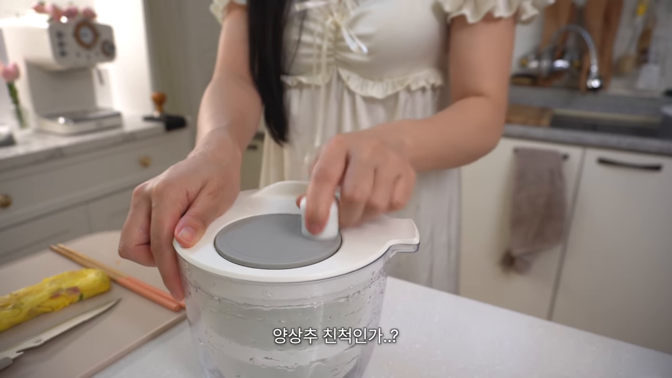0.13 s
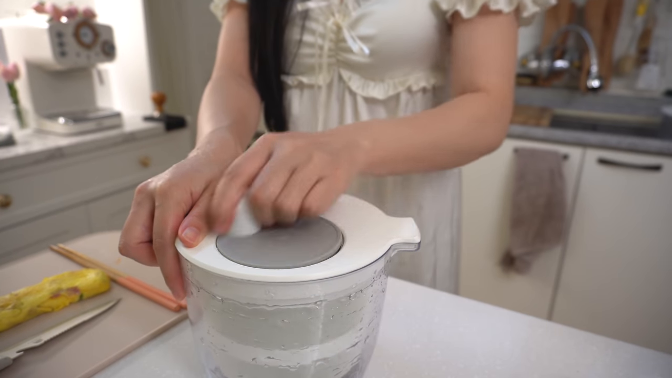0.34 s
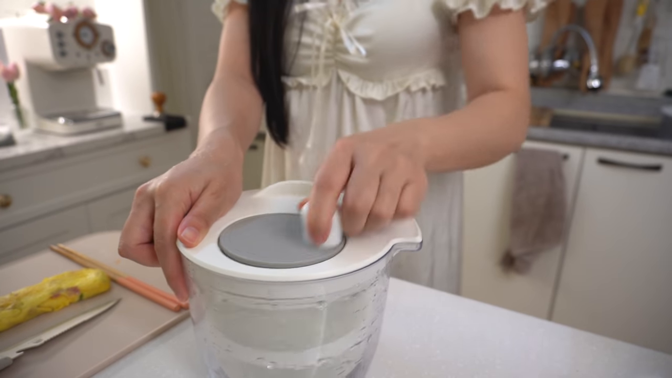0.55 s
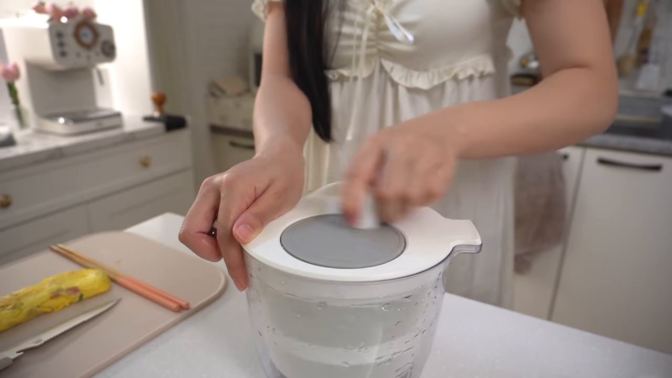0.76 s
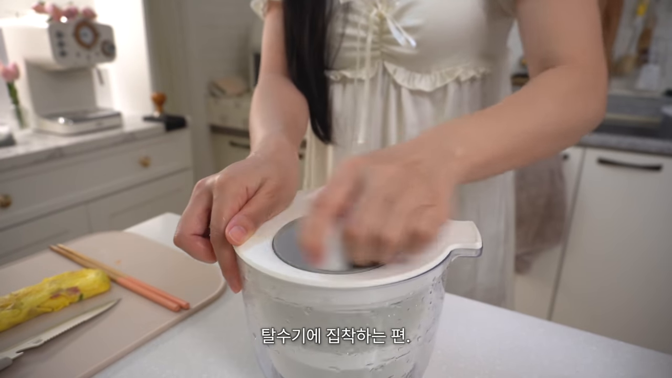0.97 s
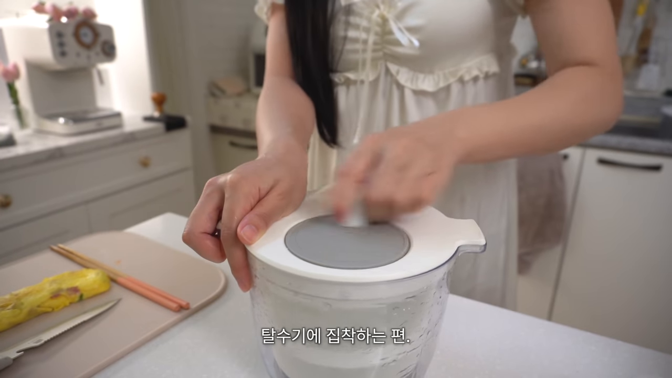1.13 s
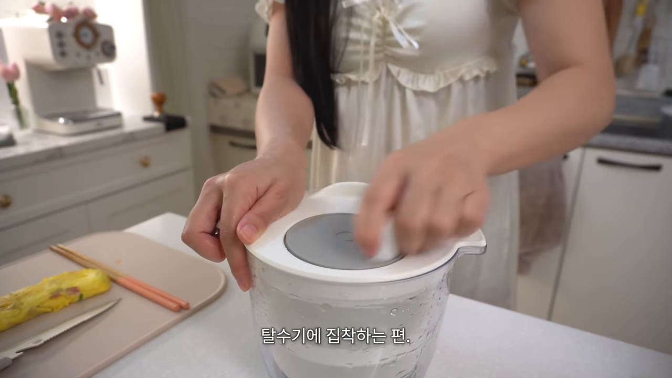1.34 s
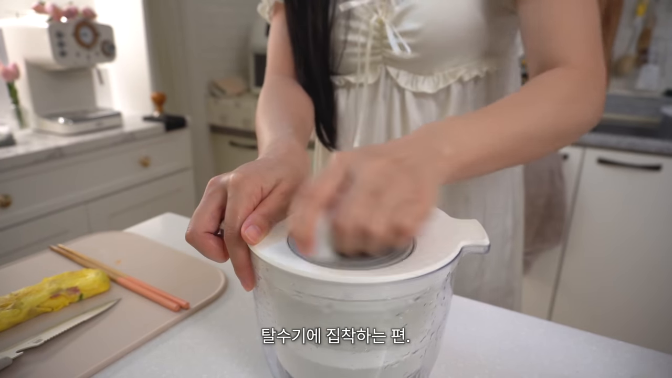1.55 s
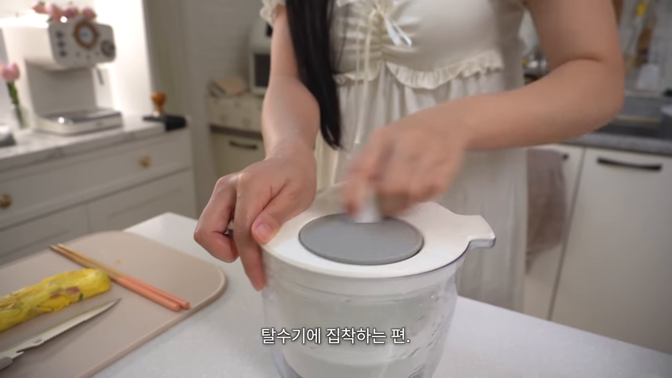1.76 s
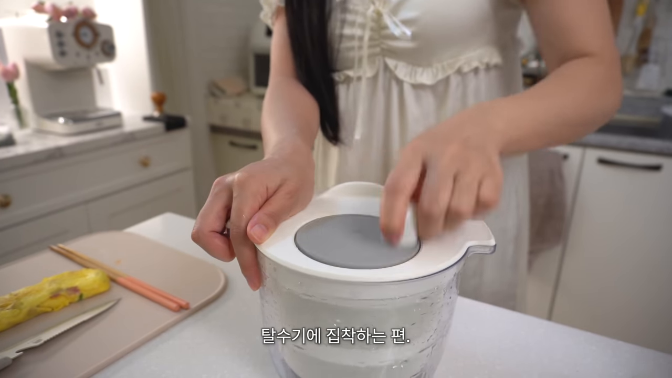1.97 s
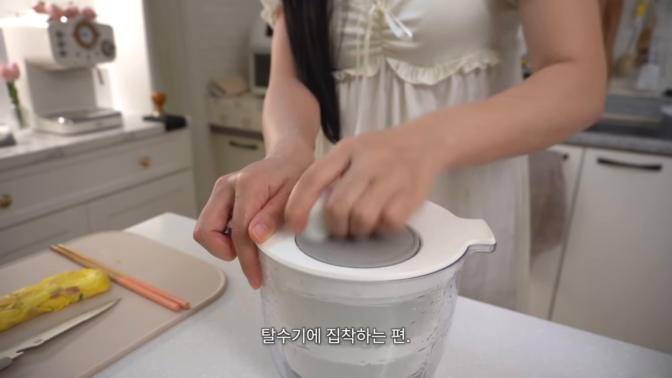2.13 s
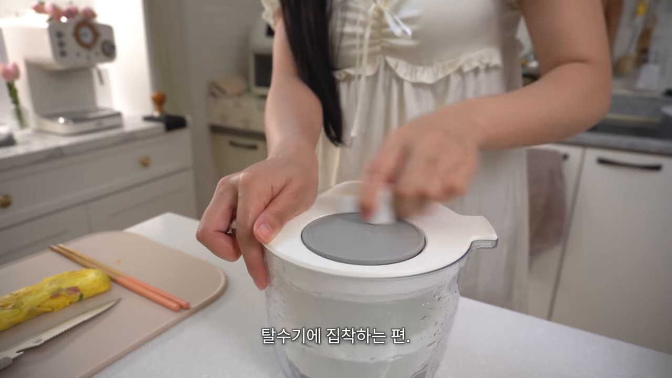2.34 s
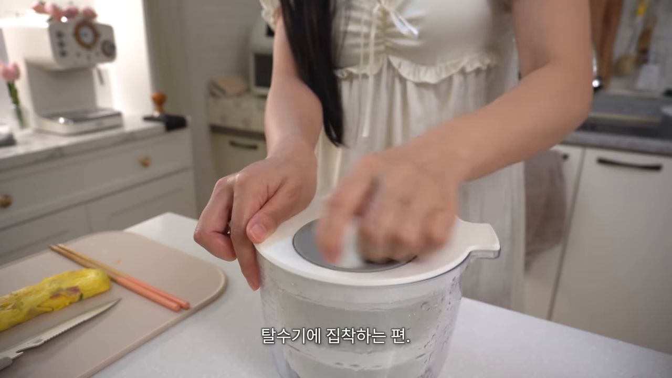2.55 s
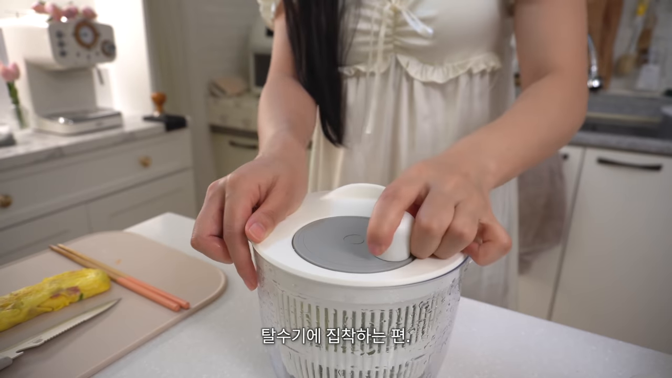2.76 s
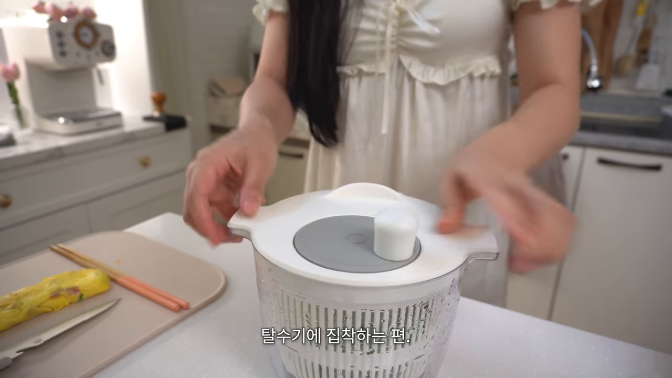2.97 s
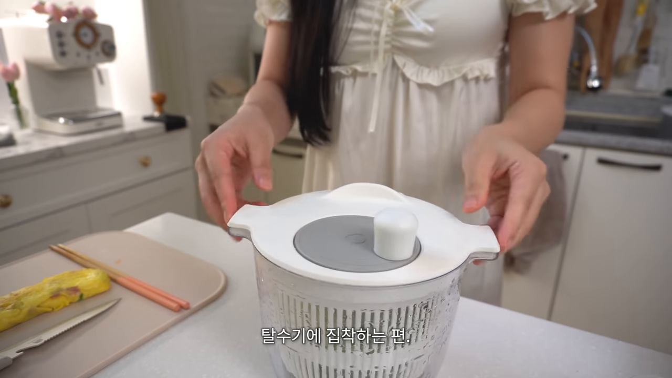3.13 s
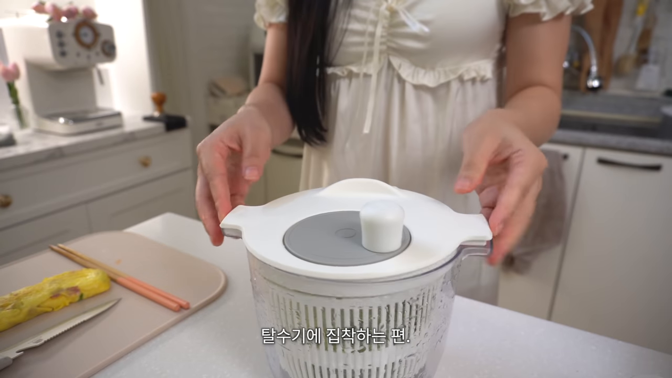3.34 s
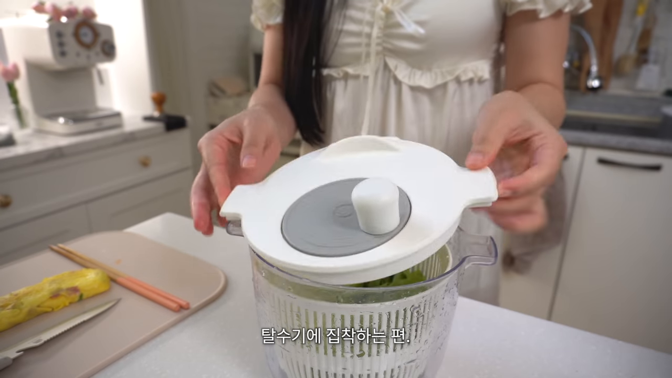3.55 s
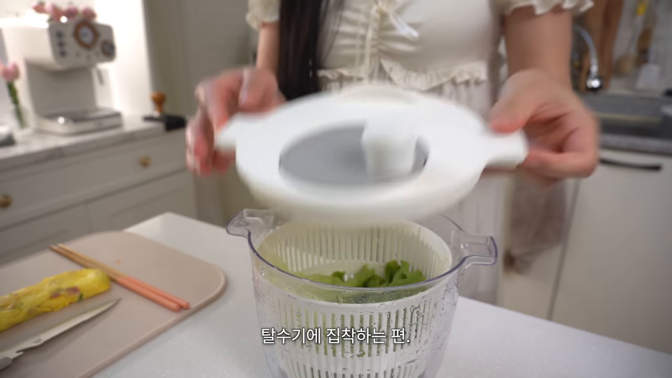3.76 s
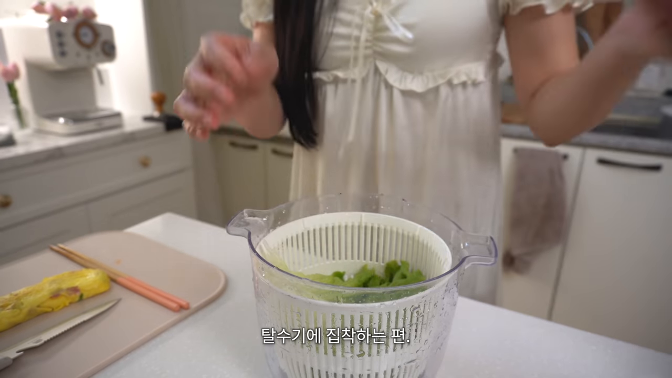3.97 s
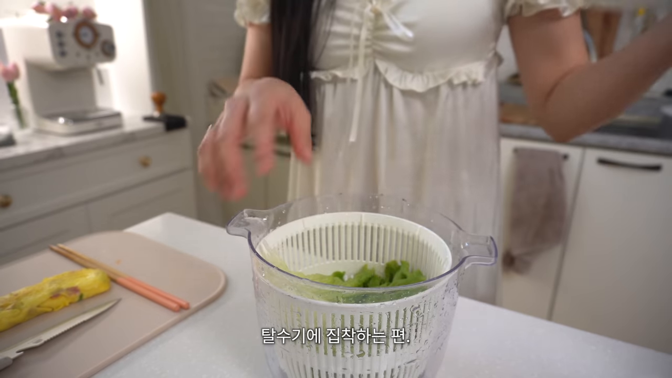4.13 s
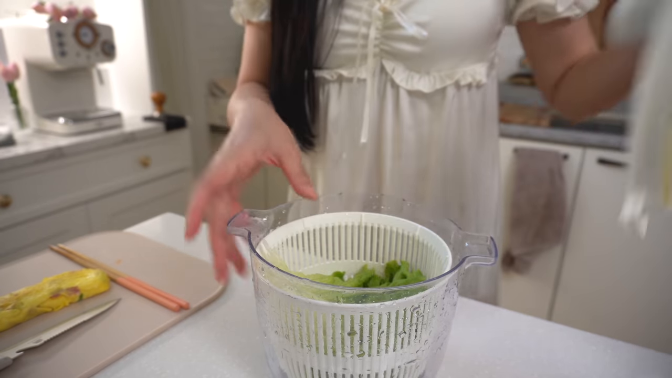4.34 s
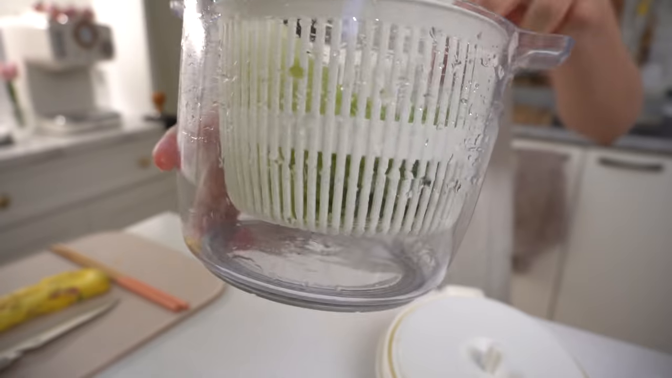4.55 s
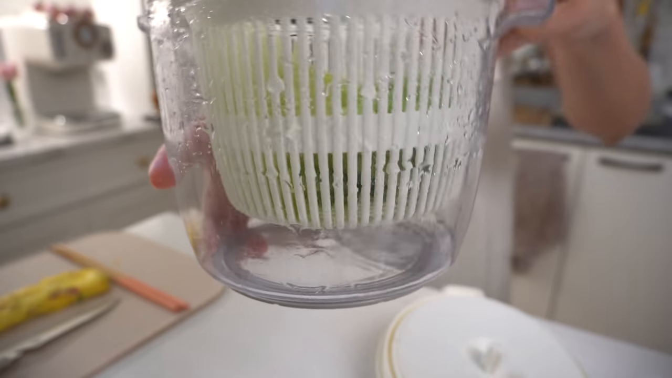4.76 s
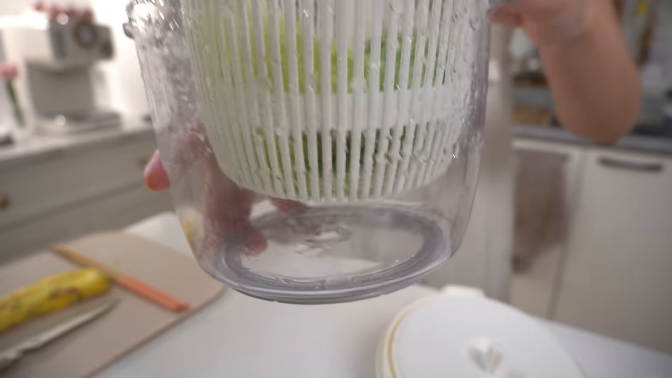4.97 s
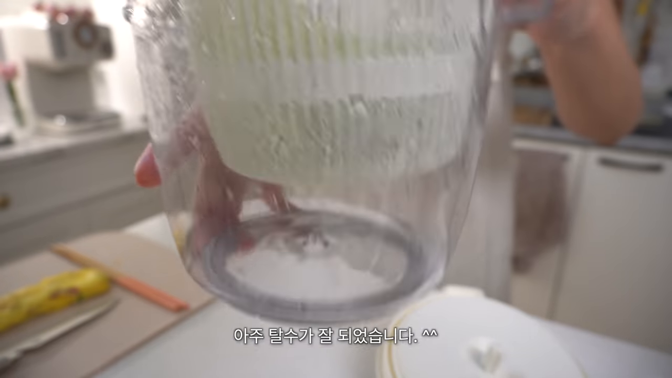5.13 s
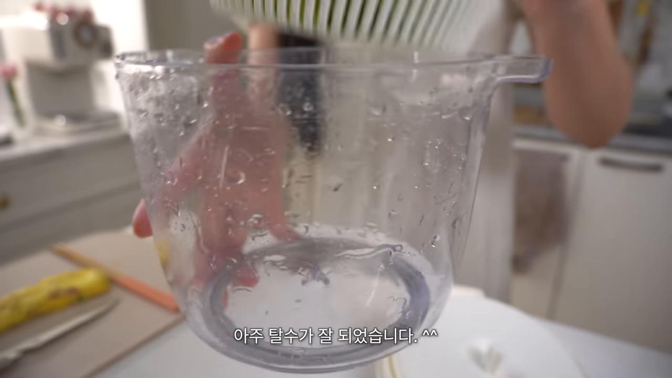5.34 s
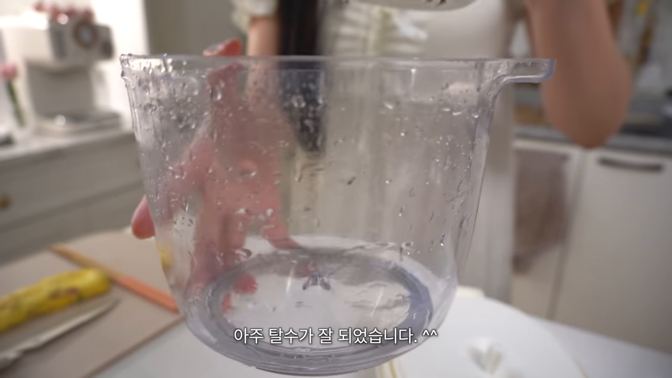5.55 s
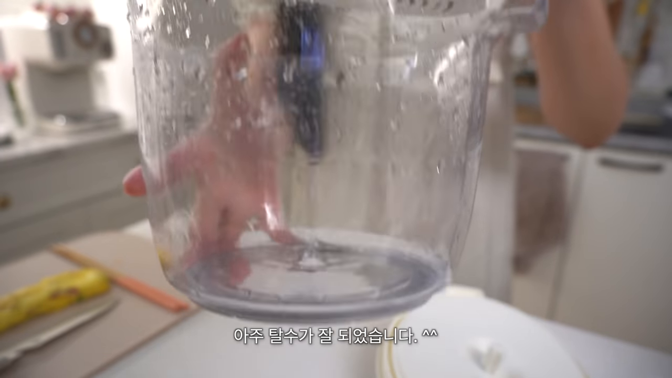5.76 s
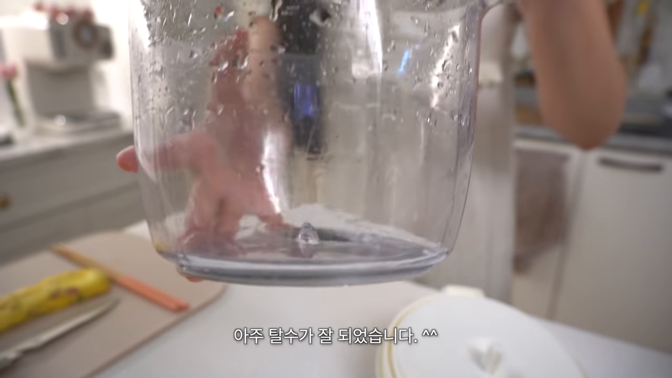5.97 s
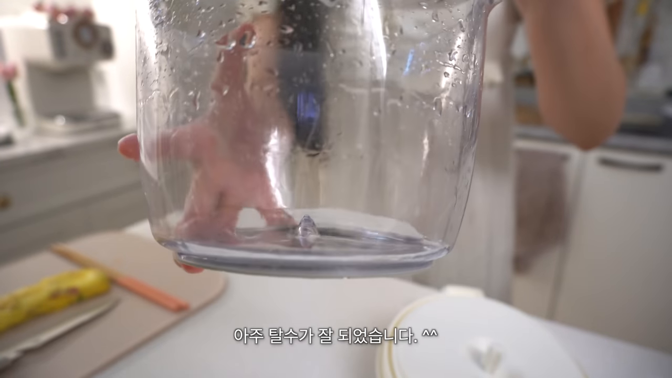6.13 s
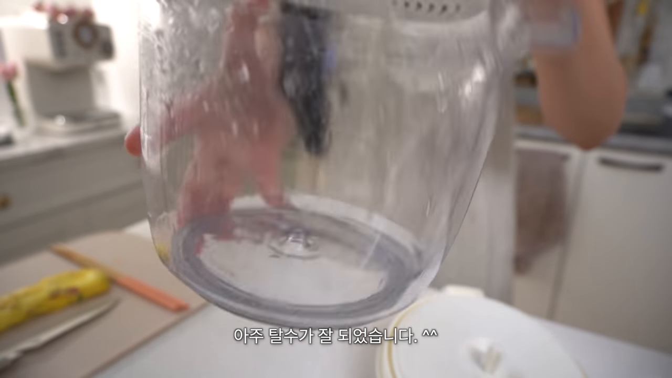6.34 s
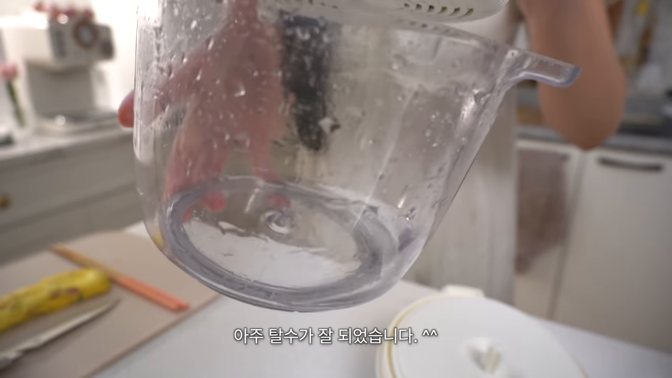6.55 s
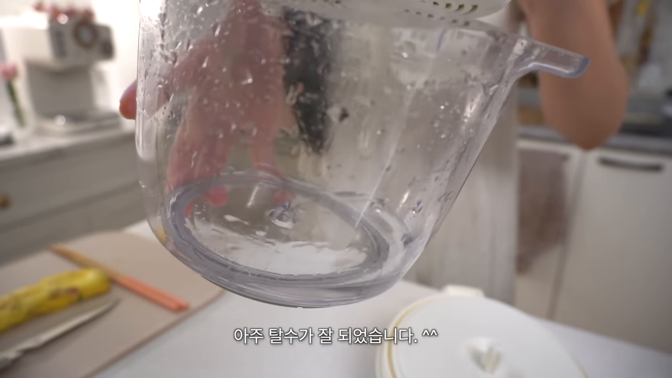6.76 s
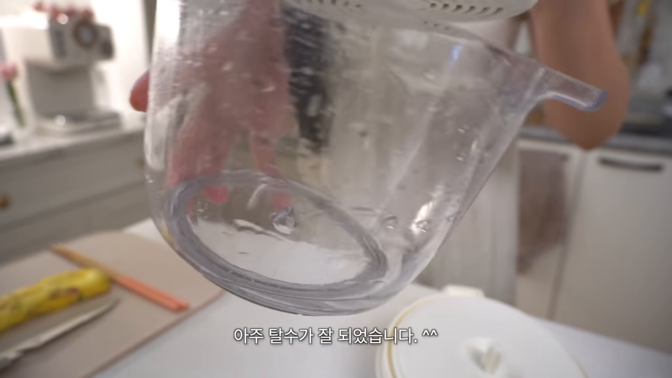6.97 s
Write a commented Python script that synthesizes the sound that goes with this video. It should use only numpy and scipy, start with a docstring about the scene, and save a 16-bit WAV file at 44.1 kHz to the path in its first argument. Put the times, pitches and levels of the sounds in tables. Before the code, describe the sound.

Close to the microphone in a home kitchen, a plastic salad spinner is cranked hard: rapid gear chatter, a hollow low rumble, sharp clacks and bowl knocks, pulsing with each turn. It stops dead, then the lid is unclipped and lifted with clicks and soft hollow thuds. After a quiet gap, the basket slides out with a sharp tick, small scrapes and faint bumps over low room hum.

```python
"""Over a quiet room hum and slow low handling thumps, a hand-cranked plastic salad spinner rattles close by:
gear teeth shake bowl and lid, with clacks, treble swishes, bowl knocks and bumps, until the brake at 2.6 s.
The lid is unclipped and lifted: clicks of plastic, thuds of the closed bowl, a scrape.
The slotted basket is drawn out and the bowl tilted in the hand: clicks, open-bowl thuds, scrapes and bumps.
Modes, filtered noise and short bursts make the sounds; a short kitchen echo follows the near ones."""
import sys
import numpy as np
from scipy import signal
from scipy.fft import rfft, irfft
from scipy.io import wavfile
from scipy.ndimage import uniform_filter1d

SR = 44100
rng = np.random.default_rng(int(sys.argv[2]) if len(sys.argv) > 2 else 0)


def generate_wav(sig):
    """Save sig (samples, or channels by samples) to the path in sys.argv[1] as 16-bit PCM at SR."""
    pcm = np.round(np.clip(np.atleast_2d(sig).T, -1, 1) * 32767).astype(np.int16)
    wavfile.write(sys.argv[1], SR, pcm)


N = 308700


def amp(db):
    """dB to gain."""
    return 10 ** (np.asarray(db) / 20)


def evened(x):
    """Scaled to rms 1."""
    return x / np.sqrt(np.mean(x ** 2) + 1e-20)


def noise():
    """White noise of full length, rms about 1."""
    return rng.standard_normal(N)


def drift(samples):
    """Slow random curve, rms 1."""
    return evened(uniform_filter1d(uniform_filter1d(noise(), samples), samples))


def read(points, hz):
    """Table over frequency, interpolated on a log axis."""
    point_hz, value = np.transpose(points)
    return np.interp(np.log(hz + 1), np.log(point_hz + 1), value)


def curve(rows):
    """Every column of a table over time, sample by sample."""
    s, *columns = np.transpose(rows)
    return [np.interp(np.arange(N) / SR, s, column) for column in columns]


def add(mix, s, sound):
    """Mixes a sound in at second s."""
    part = mix[round(s * SR):][:len(sound)]
    part += sound[:len(part)]


def coloured(x, spectrum):
    """Causal minimum-phase filter with the given spectrum; output rms 1."""
    hz = abs(np.fft.fftfreq(8192, 1 / SR))
    log_gain = np.log(amp(np.maximum(read(spectrum, hz), -100)))
    taps = np.fft.ifft(np.exp(np.conj(signal.hilbert(log_gain)))).real[:4096]
    return evened(signal.oaconvolve(x, taps)[:len(x)])


def sliding(x, hz, width_hz):
    """Resonance whose pitch follows the curve hz: shift to 0 Hz, one-pole low-pass, shift back."""
    turn = np.exp(2j * np.pi * np.cumsum(hz) / SR)
    r = np.exp(-np.pi * width_hz / SR)
    return evened((turn * signal.lfilter([1 - r], [1, -r], x / turn)).real)


def ring(modes, colour_hz, octaves, damping=0.94, contact_cycles=0.13, spread=.012):
    """Struck object: decaying modes, those near the blow's colour favoured, softened by the contact; peak 1."""
    hz, db, t60_s = np.transpose(modes)[:, :, None]
    t = np.arange(SR // 4) / SR
    db = db - 11.0 * (np.log2(hz / colour_hz) / octaves) ** 2 + 2 * rng.standard_normal(hz.shape)
    detune = 1 + spread * rng.standard_normal(hz.shape)
    phase = 2 * np.pi * hz * t * detune + 2 * rng.random(hz.shape)
    soft = (1 - np.exp(-t * colour_hz / contact_cycles)) ** 2
    sound = soft * (amp(db - 60 * t * damping / t60_s) * np.sin(phase)).sum(0)
    return sound / abs(sound).max()


# modes of the thin plastic of lid, basket and rim: pitch_hz, level_db, t60_s (before damping)
PLASTIC_MODES = [(973, 9.5, 0.034), (1150, -1, 0.034), (1329, 5.5, 0.014), (1550, 5, 0.011),
                 (1910, 9.5, 0.014), (2180, 8, 0.01), (2586, 8.5, 0.012), (2995, 6.5, 0.016),
                 (3490, -0.5, 0.016), (3900, -4, 0.0033), (4230, -12, 0.0023), (5050, -6, 0.024),
                 (5900, 2.5, 0.006)]


def contacts(shape, colour_hz, top_db, edge, noisy=1.0, octaves=0.64, grainy_db=6.5):
    """Tiny uneven contacts under a shape: noise around the colour, cut below edge x colour, rings the plastic."""
    grains_db = grainy_db * np.repeat(rng.standard_normal(len(shape) // 40 + 1), 40)[:len(shape)]
    burst = shape * amp(grains_db) * rng.standard_normal(len(shape))
    slope = [(.5 * edge * colour_hz, -36), (edge * colour_hz, -8), (colour_hz, 0),
             (1.45 * colour_hz, -9), (20000, top_db)]
    rung = signal.oaconvolve(burst, ring(PLASTIC_MODES, colour_hz, octaves))[:len(shape)]
    return noisy * coloured(burst, slope) + evened(rung)


def click(colour_hz, t60_s, top_db, edge):
    """Burst of contacts with a sharp 10 ms start and a tail over t60_s; peak 1."""
    t = np.arange(SR // 4) / SR
    decay = amp(-60 * t / t60_s) + 1.6 * amp(-60 * t / 0.01)
    onset = 1 - np.exp(-t / 0.00056)
    sound = contacts(decay * onset, colour_hz, top_db, edge, noisy=1.4, grainy_db=4.0)
    return sound / abs(sound).max()


# hum spectrum: pitch_hz, level_db_per_hz (relative)
HUM_SPECTRUM = [(41, -65), (70, -24.5), (96, -18.5), (162, -6), (243, -9), (278, 0.5), (340, -10.5),
                (525, -14), (863, -16), (2340, -35.5), (5160, -41.5), (15600, -45.5)]
HUM_DB = -66
# faint wavering tone: pitch_hz, level_db
WHISTLES = [(5281, -88.5)]
# level of the sub-bass sway: time_s, level_db
HANDLING_LEVEL = [(0.0, -47), (1.0, -38.5), (1.73, -36), (3.78, -59.5), (4.99, -50), (5.66, -65.5),
                  (6.28, -57.5), (6.58, -64), (6.99, -55)]
# sway spectrum: pitch_hz, level_db_per_hz (relative)
SWAY_SPECTRUM = [(5, -6), (14, 16), (35, -4.5), (60, -2.5), (100, -44)]


def room_tone():
    """Steady hum of filtered noise, a faint tone wavering in level and phase, and sub-bass handling sway."""
    tone = amp(HUM_DB) * coloured(noise(), HUM_SPECTRUM)
    t = np.arange(N) / SR
    for hz, db in WHISTLES:
        waver = evened(uniform_filter1d(noise(), 2500))
        tone += amp(db + 3.0 * waver) * np.sin(2 * np.pi * hz * t + 3.0 * waver)
    return tone + amp(curve(HANDLING_LEVEL)[0]) * coloured(noise(), SWAY_SPECTRUM)


# the crank: time_s, rumble_db, rattle_db (above the rumble), teeth_per_s (mean pace)
CRANK = [(0.0, -30, -8.5, 75.7), (0.4, -30.5, -7, 68.4), (0.65, -28.5, 1.5, 84), (0.9, -25.5, -11, 87.6),
         (1.2, -27.5, -2.5, 93), (1.5, -28.5, -5, 119), (1.68, -27, -6, 102), (2.05, -26.5, -5.5, 113.6),
         (2.35, -28, -8.5, 100.3), (2.6, -32, -8, 81)]
# the hand eases off once a turn and the gear runs slack: middle_s, dip_db (of the rattle)
SLACKS = [(0.197, -10), (0.588, -14.5), (0.76, -6), (1.09, -10.5), (1.422, -6), (1.75, -7), (2.047, -6),
          (2.369, -7)]
SLACK_S, RUMBLE_SHARE = 0.072, 0.61  # Gaussian sigma of a dip; share of it the rumble follows
BRAKE_S, BRAKE_DB_PER_S = 2.602, -370


def cranking():
    """Levels of rumble and rattle, dipped at every slack and cut by the brake, and the pace of the gear."""
    t = np.arange(N) / SR
    rumble_db, rattle_db, teeth_per_s = curve(CRANK)
    slack_db = sum(db * np.exp(-.5 * ((t - s) / SLACK_S) ** 2) for s, db in SLACKS)
    brake_db = BRAKE_DB_PER_S * np.maximum(t - BRAKE_S, 0)
    rumble_db = rumble_db + RUMBLE_SHARE * slack_db + brake_db
    rattle_db = rattle_db + (1 - RUMBLE_SHARE) * slack_db  # relative to the rumble
    return rumble_db, rattle_db, teeth_per_s


def gear_teeth(teeth_per_s):
    """Loose teeth strike with uneven force at a wandering pace: one impulse a tooth."""
    wander = .2 * evened(uniform_filter1d(noise(), 300)) + .04 * drift(1500)
    turns = np.floor(np.cumsum(teeth_per_s * np.clip(1 + wander, .2, 3)) / SR)
    return (np.diff(turns, prepend=0) > 0) * amp(3 * np.minimum(noise(), 1))


# modes of air and walls of the bowl under the lid: pitch_hz, level_db, t60_s (before damping)
CLOSED_MODES = [(161, -7, 0.082), (188, -0.5, 0.089), (272, -8, 0.15), (309.5, 0, 0.07), (374, 0.5, 0.0943),
                (418, -3, 0.095), (493, -5.5, 0.16), (574, -5, 0.087), (720, 6.5, 0.028)]


def shaken_bowl(shake):
    """Shaking spread at random over six places of the closed bowl, each ringing in its own colour."""
    patch = rng.integers(0, 6, N)
    bowl = np.zeros(N)
    for k, hz in enumerate(np.geomspace(190, 540, 6)):
        push = shake * (patch == k) * amp(4 * drift(1800))
        bowl += signal.oaconvolve(push, ring(CLOSED_MODES, hz, .65, damping=3, spread=.05))[:N]
    return bowl


def rattling_lid(rattle, rattle_db):
    """The contact travels round the lid, so its resonances slide and swell; pressed harder, they rise."""
    lid = np.zeros(N)
    press = 1 + .015 * (np.clip(rattle_db, -15, 0) + 8)
    for hz, _, t60_s in PLASTIC_MODES[:-2]:
        lid += sliding(rattle * amp(5 * drift(1300)), hz * (press + .04 * drift(1800)), 1.7 / t60_s)
    return lid


# rumble spectrum: pitch_hz, level_db_per_hz (relative)
RUMBLE_SPECTRUM = [(41, -43.5), (80, -15.5), (135, -1), (190, 6.5), (444, -4), (504, 2), (821, -21),
                   (982, -5), (1500, -15), (2300, -24.5), (4000, -62)]
# rattle spectrum: pitch_hz, level_db_per_hz (relative)
RATTLE_SPECTRUM = [(410, -25.5), (700, -4), (829, -7), (981, -4), (1630, -7.5), (2140, -6.5), (3300, -13.5),
                   (4500, -17), (5300, -19.5), (7550, -20), (15600, -37)]


def spinner():
    """Gear teeth over sliding noise shake the bowl and tick on the lid."""
    rumble_db, rattle_db, teeth_per_s = cranking()
    teeth = gear_teeth(teeth_per_s)
    bounce = amp(-60 * np.arange(1500) / SR / .016)  # each tooth bounces for a few ms
    chatter = signal.oaconvolve(teeth, bounce)[:N]
    rattle = (evened(chatter) + 0.68) * noise()
    shake = evened(teeth) + 1.25 * noise()
    rumble = .7 * evened(shaken_bowl(shake)) + coloured(shake, RUMBLE_SPECTRUM)
    bright = 1.24 * evened(rattle) + 0.9 * evened(rattling_lid(rattle, rattle_db))
    return amp(rumble_db) * (evened(rumble) + amp(rattle_db) * coloured(bright, RATTLE_SPECTRUM))


# hard plastic clacks while the crank turns: start_s, level_db, colour_hz
CLACKS = [(0.0527, -18.5, 1530), (0.1497, -25, 1340), (0.301, -19.5, 1620), (0.3503, -18, 2208),
          (0.5242, -15, 1450), (0.6452, -15, 1390), (0.6778, -18.5, 1352), (0.841, -20, 1980),
          (0.8628, -14.5, 1745), (1.036, -10, 1588), (1.101, -21, 2180), (1.1427, -15.5, 1443),
          (1.209, -10.5, 1900), (1.257, -13.5, 1506), (1.6635, -16.5, 1347), (1.7996, -17.5, 2000),
          (1.844, -17.5, 1374), (1.9666, -13, 1390), (2.1124, -14.5, 2080), (2.1386, -20.5, 1391),
          (2.2752, -19, 1450), (2.4928, -16.5, 2410), (2.569, -25, 2883)]


def clacks():
    """Each clack is a click, brighter when harder, and a damped ring of the plastic."""
    out = np.zeros(N)
    for s, db, hz in CLACKS:
        add(out, s, amp(db) * click(hz, 0.027, -22.5 + 1.1 * db, 0.31))
        add(out, s, amp(db - 10.5) * ring(PLASTIC_MODES, hz, 0.26, damping=3.0, spread=.04))
    return out


# thin high swishes, perhaps water flung against the wall: middle_s, level_db
SWISHES = [(0.122, -53), (0.285, -52), (0.427, -53), (0.59, -51), (0.828, -50), (1.055, -58.5),
           (1.90, -56.5), (2.55, -58)]
# swish spectrum: pitch_hz, level_db_per_hz (relative)
SWISH_SPECTRUM = [(5000, -27), (9000, -12.5), (14000, -3)]
SWISH_S = .017  # Gaussian sigma


def swishes():
    """Smooth treble hiss that swells and fades."""
    t = np.arange(N) / SR
    shape = sum(amp(db) * np.exp(-.5 * ((t - s) / SWISH_S) ** 2) for s, db in SWISHES)
    return shape * coloured(noise(), SWISH_SPECTRUM)


# the spinning basket knocks the bowl: start_s, level_db, colour_hz
KNOCKS = [(0.381, -12.5, 493), (0.401, -20, 404), (0.527, -9, 466), (0.645, -8, 462), (0.76, -18, 522),
          (0.916, -12, 470), (1.037, -6.5, 263.2), (1.058, -12, 265), (1.14, -15.5, 303),
          (1.256, -11.5, 517), (1.3581, -8.5, 561), (1.556, -11.5, 380), (1.663, -7.5, 517),
          (1.8, -13.5, 343), (1.845, -13, 246), (1.965, -18.5, 213.5), (2.113, -16, 170.7),
          (2.273, -11.5, 542.4), (2.508, -12.5, 302.5), (2.518, -11, 275.5)]


def knocks():
    """Soft blows on the closed bowl, damped fast by the hand on the lid."""
    out = np.zeros(N)
    for s, db, hz in KNOCKS:
        add(out, s, amp(db) * ring(CLOSED_MODES, hz, 0.43, damping=5.7, contact_cycles=0.49))
    return out


# soft low bumps of the hand: start_s, level_db
BUMPS = [(0.629, -26.5), (1.032, -28), (4.93, -40.5), (5.012, -36.5), (5.103, -36), (5.19, -47),
         (5.839, -47), (6.386, -41.5)]
BUMP_HZ = 52.1


def bumps():
    """A low sine that swells and dies within a cycle or two."""
    out = np.zeros(N)
    turns = np.arange(SR // 8) / SR * BUMP_HZ
    bump = np.e * 2 * turns * np.exp(-2 * turns) * np.sin(2 * np.pi * turns)
    for s, db in BUMPS:
        add(out, s, amp(db) * bump)
    return out


# blows on the lid: start_s, click_db, click_hz, thud_db, thud_hz
LID = [(2.8252, -36, 2570, -50, 197), (2.849, -43, 1980, -46, 150), (2.8599, -25, 1480, -36, 280),
       (2.885, -19.5, 1470, -14, 215), (2.9166, -34, 1840, -23, 398), (2.9488, -39.5, 2600, -30, 327),
       (3.024, -37.5, 2330, -22, 238), (3.0739, -49, 2700, -31.5, 210), (3.101, -31, 3770, -28.5, 312),
       (3.12, -35.5, 2630, -22, 353), (3.134, -43.5, 2880, -28.5, 417), (3.1822, -30.5, 2400, -18, 373),
       (3.2411, -46.5, 2390, -48, 374), (3.3379, -36.5, 2490, -26.5, 312), (3.37, -33.5, 4340, -36.5, 296),
       (3.4072, -42.5, 4450, -69, 335), (3.4296, -40.5, 2180, -11.5, 340), (3.461, -36.5, 2000, -23, 350),
       (3.477, -34, 3900, -23.5, 327), (3.5176, -43.5, 3520, -40, 320), (3.5403, -31, 2180, -36, 437)]
LID_T60_S, LID_TREBLE_DB, LOOSE_S = 0.065, -29, 3.3
# octaves, damping, contact_cycles: a loose lid lets the bowl ring longer, at a narrower pitch
HELD, LOOSE = (1, 1.73, 0.13), (0.36, 1.17, 0.35)


def lid_blows():
    """The lid comes off: each blow is a click of the plastic and a thud of the closed bowl."""
    out = np.zeros(N)
    for s, click_db, click_hz, thud_db, thud_hz in LID:
        thud = ring(CLOSED_MODES, thud_hz, *(LOOSE if s > LOOSE_S else HELD))
        add(out, s, amp(click_db) * click(click_hz, LID_T60_S, LID_TREBLE_DB, 0.14))
        add(out, s, amp(thud_db) * thud)
    return out


# wet plastic sliding on plastic: middle_s, level_db, colour_hz, sigma_s
SCRAPES = [(2.874, -49.5, 1870, 0.025), (4.266, -54, 1290, 0.013), (4.325, -58, 1450, 0.012),
           (4.418, -55, 1740, 0.008), (4.508, -62, 2000, 0.012), (4.866, -61, 2900, 0.01),
           (5.094, -57.5, 4500, 0.011), (5.105, -47.5, 1910, 0.0088), (5.184, -65.5, 3200, 0.055),
           (5.217, -56, 3520, 0.0034), (5.244, -55, 2850, 0.007), (5.267, -45, 3730, 0.0092),
           (5.282, -53, 2600, 0.0037), (5.264, -51.5, 5900, 0.0085), (5.876, -60, 2750, 0.018),
           (5.929, -68, 2930, 0.019)]


def scrapes():
    """Fine plastic contacts that swell and fade."""
    out = np.zeros(N)
    t = np.arange(-SR // 5, SR // 5) / SR
    for s, db, hz, sigma_s in SCRAPES:
        shape = np.exp(-.5 * (t / sigma_s) ** 2)
        scrape = contacts(shape, hz, -36, .66, noisy=.7, octaves=.38, grainy_db=4.5)
        add(out, s + t[0], amp(db) * np.sqrt(np.mean(shape ** 2)) * scrape)
    return out


# basket and fingers touch the open bowl: start_s, click_db, click_hz, thud_db, treble_db (of the click)
BASKET = [(4.247, -41, 1320, -83, -52), (4.3755, -55, 1790, -36, -37), (4.4046, -47.5, 3000, -42, -55),
          (4.504, -42, 3460, -54.5, -35), (4.875, -18, 3100, -32.5, -23.5),
          (4.927, -29.5, 2670, -36.5, -49), (5.012, -36, 3130, -49, -30), (5.0996, -31.5, 2600, -54.5, -11),
          (5.194, -38.5, 2340, -62, -29), (5.8333, -28, 2320, -31.5, -43), (6.389, -73, 1730, -53, -34),
          (6.613, -55, 3190, -59, -34), (6.8327, -56, 3260, -63, -29)]
# modes of air and walls of the open bowl: pitch_hz, level_db, t60_s (before damping)
OPEN_MODES = [(509.3, 0, 0.1), (574, -9.5, 0.23), (430, 3.5, 0.027), (653, 10.5, 0.018)]
BASKET_T60_S, BASKET_DAMPING = 0.065, 1.76


def basket_touches():
    """The basket leaves the bowl: clicks of plastic and soft thuds around the first open-bowl mode."""
    out = np.zeros(N)
    for s, click_db, click_hz, thud_db, treble_db in BASKET:
        thud = ring(OPEN_MODES, OPEN_MODES[0][0], .7, BASKET_DAMPING, contact_cycles=1.1)
        add(out, s, amp(click_db) * click(click_hz, BASKET_T60_S, treble_db, 0.71))
        add(out, s, amp(thud_db) * thud)
    return out


# echo decay: pitch_hz, t60_s
KITCHEN_DECAY = [(200, 0.32), (700, 0.29), (3000, 0.16), (12000, 0.18)]


def kitchen(x):
    """Short dry echo: sparse random-sign taps, each band dying at its own speed, faded out by about 0.12 s."""
    taps = np.zeros(SR // 2)
    at = np.arange(150, SR // 2 - 20, 20)
    taps[at + rng.integers(0, 20, len(at))] = rng.choice([-1., 1.], len(at))
    hz, t, bands = signal.stft(taps, SR, nperseg=256)
    fade = 1 / (1 + np.exp((t - .12) / 0.02))
    decay = amp(-60 * t / read(KITCHEN_DECAY, hz)[:, None])
    tail = signal.istft(bands * fade * decay, SR, nperseg=256)[1]
    return signal.oaconvolve(x, tail / np.linalg.norm(tail))[:N]


def scene():
    """Everything near the microphone, its echo, the bumps and the room, the same on both channels."""
    near = spinner() + clacks() + swishes() + knocks() + lid_blows() + scrapes() + basket_touches()
    # high-pass keeps the near sounds free of deep bass
    near = signal.sosfilt(signal.butter(3, 105.0, "high", fs=SR, output="sos"), near)
    mono = near + amp(-8.0) * kitchen(near) + bumps() + room_tone()
    return np.array([mono, mono])


# microphone response: pitch_hz, gain_db
MICROPHONE = [(5000, 0.5), (9500, -2.5), (11000, -11), (16000, -12)]
EDGE_HZ = 15800


def record(dry):
    """The microphone dulls the top; then a low-pass limits the band."""
    hz = np.fft.rfftfreq(N, 1 / SR)
    dulled = irfft(rfft(dry) * amp(read(MICROPHONE, hz)), N)
    low_pass = signal.firwin(511, EDGE_HZ, window=("kaiser", 9), fs=SR)
    return signal.oaconvolve(dulled, low_pass[None], "same")


dry = scene()
out = record(dry)
generate_wav(out)
```